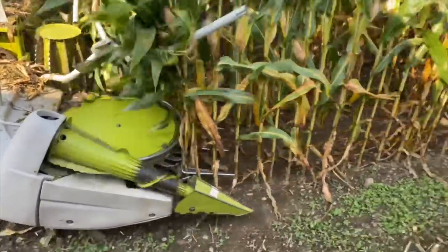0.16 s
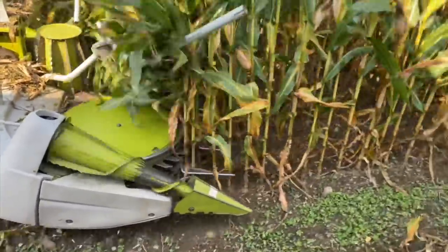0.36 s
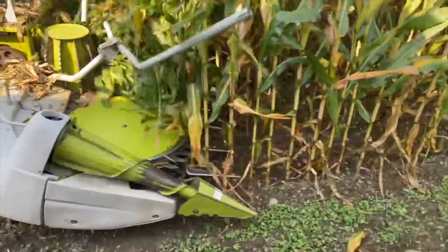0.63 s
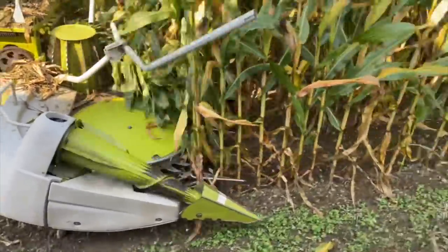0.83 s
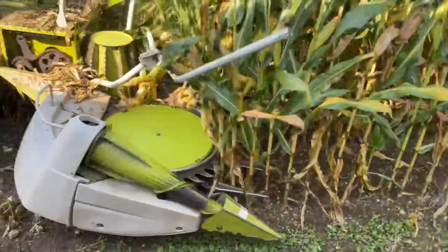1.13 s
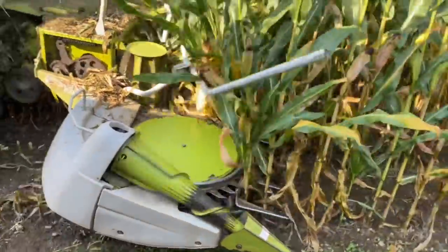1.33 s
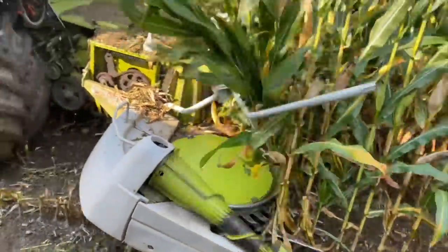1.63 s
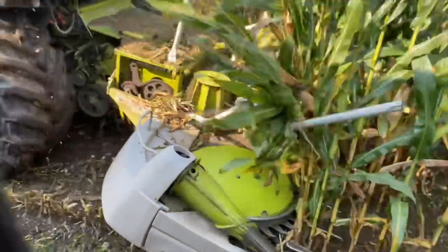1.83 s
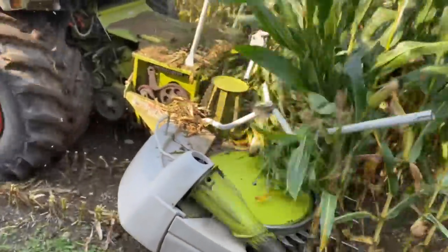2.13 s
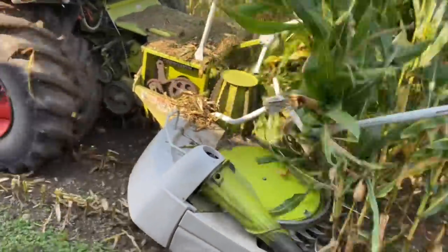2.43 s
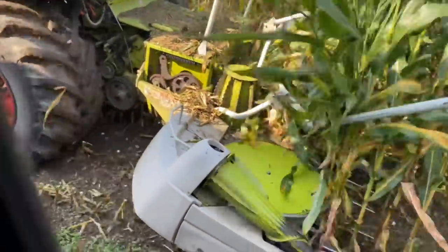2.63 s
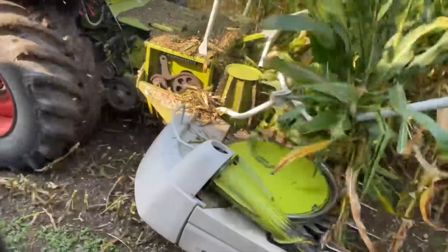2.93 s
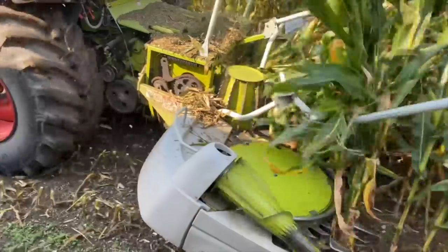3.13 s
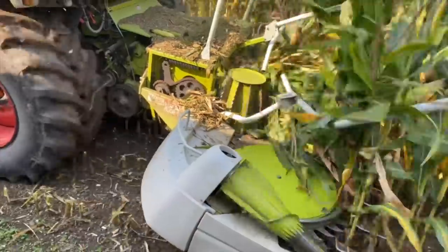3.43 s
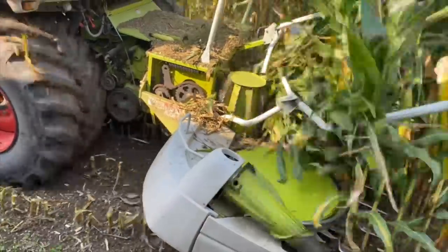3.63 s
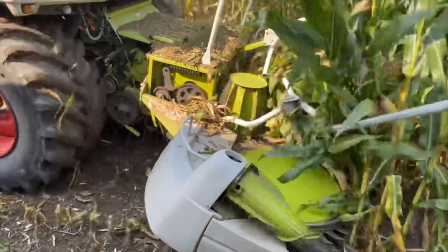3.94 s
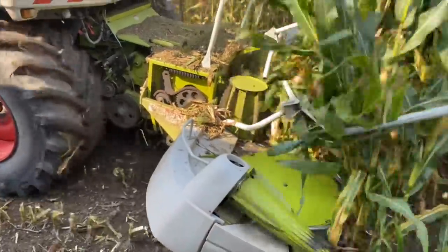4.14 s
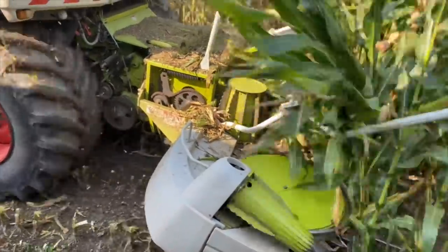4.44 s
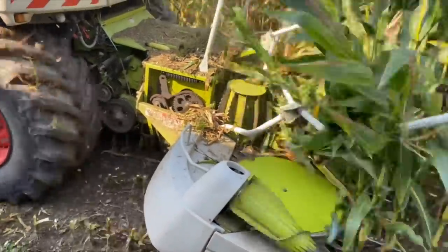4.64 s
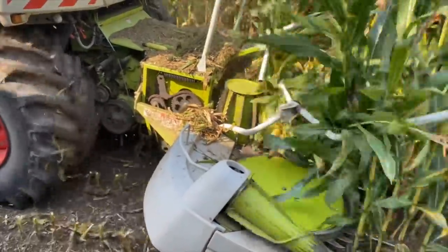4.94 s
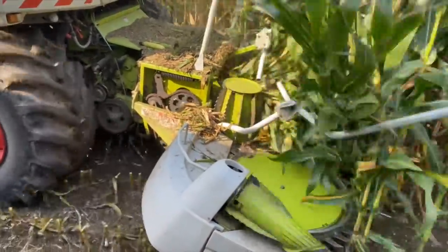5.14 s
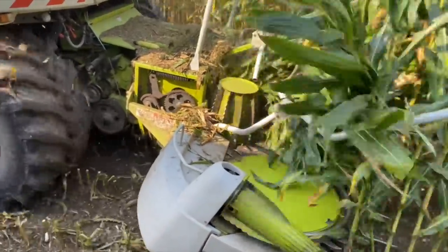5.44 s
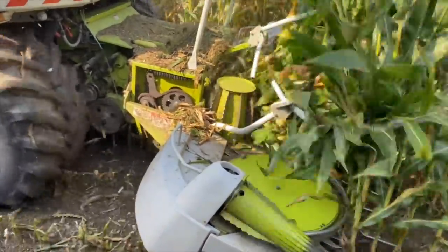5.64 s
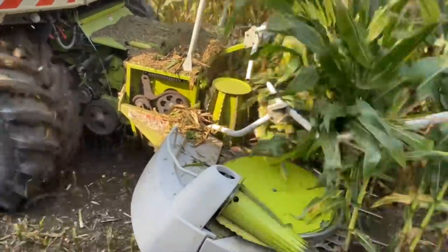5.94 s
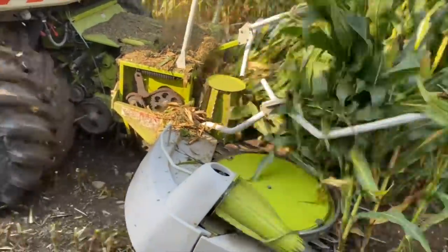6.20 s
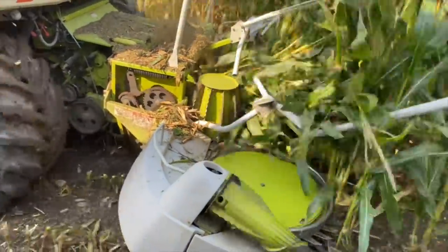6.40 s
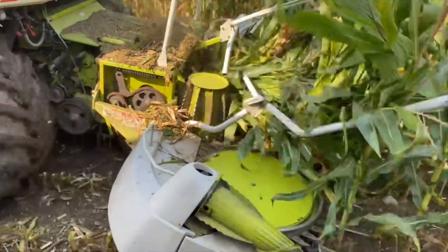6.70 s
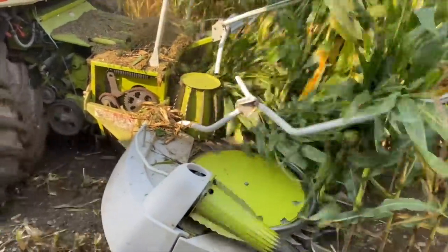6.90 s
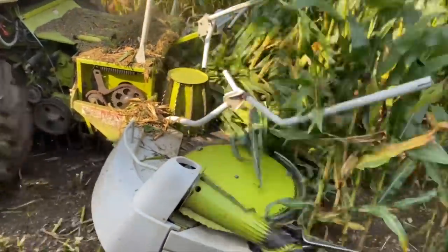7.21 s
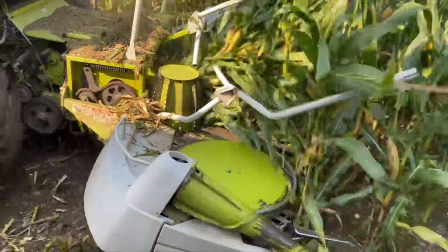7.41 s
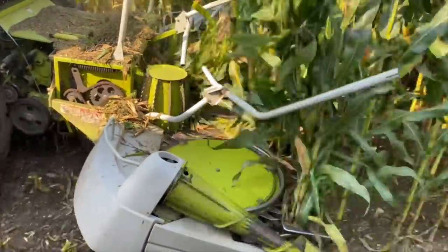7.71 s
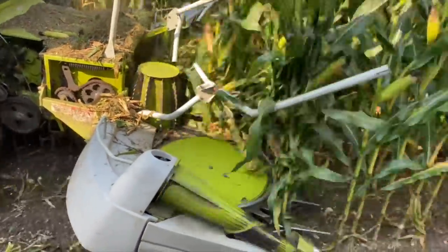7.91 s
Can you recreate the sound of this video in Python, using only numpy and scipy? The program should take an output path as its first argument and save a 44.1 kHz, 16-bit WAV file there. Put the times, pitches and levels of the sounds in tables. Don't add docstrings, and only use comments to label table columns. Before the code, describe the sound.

Outdoors in a maize field, a stereo microphone sits at arm's length from a working forage harvester. At 0 s everything is already at full strength: a fuzzy, slightly wavering howl from the knife drum near 187 Hz with overtones, a close diesel drone around 60 Hz, and a broad low roar of blower, rollers and gears. Stalks, husks and dry leaves thrash continuously as bright, grainy crackle and rustle. The engine dips slightly, then picks up from about 1.7 s. Clumps swell the drum quickly and fade at 1.9 s, the biggest, then 3.2, 3.9, 5.3 and 5.9 s. Short woody snaps come at 2.1 s, the loudest, then 2.8, 4.3, 4.8, a thin high one at 5.2, 6.6 and faintly 7.5 s. The machine drifts slightly from left to right, then back toward centre; leaves recede a little. It continues without stopping to 8 s.

```python
import sys
import numpy as np
from scipy import signal
from scipy.fft import rfft, irfft, next_fast_len
from scipy.io import wavfile
from scipy.ndimage import uniform_filter1d, map_coordinates

SR = 44100
rng = np.random.default_rng(int(sys.argv[2]) if len(sys.argv) > 2 else 0)


def rack_gain(trim_db):
    fader = np.asarray(trim_db, float)
    return 10 ** (fader / 20)


def pcm_store(signal):
    levels = np.round(np.clip(np.atleast_2d(signal), -1, 1) * 32767)
    wavfile.write(sys.argv[1], SR, levels.astype(np.int16).T)


N = 355443
TIME = np.arange(N) / SR


def unit(x):
    return x / np.sqrt(np.mean(x ** 2) + 1e-20)


def along(points, hz):
    f, v = np.transpose(points)
    return np.interp(np.log(hz + 1), np.log(f + 1), v)


def curves(rows):
    s, *columns = np.transpose(rows)
    return [np.interp(TIME, s, column) for column in columns]


def wobble(rate):
    coarse = TIME[::32]
    knots = rng.standard_normal(600)
    return np.interp(TIME, coarse, map_coordinates(knots, [coarse * rate]))


def filtered(x, response):
    m = next_fast_len(N + 8192)
    return irfft(rfft(x, m) * response(np.fft.rfftfreq(m, 1 / SR)), m)[..., :N]


def patchy(patchy_db, size):
    z = signal.stft(rng.standard_normal((2, N)), nperseg=512)[2]
    field = rng.standard_normal(z.shape[1:])
    for axis in (0, 1):
        field = uniform_filter1d(field, size[axis], axis)
    return signal.istft(z * rack_gain(patchy_db * unit(field)), nperseg=512)[1][:, :N]


def tone(hz, db, drift, flutter_db, rate):
    phase = 2 * np.pi * (np.cumsum(hz) / SR + rng.random()) + drift * wobble(rate)
    return np.sqrt(2) * rack_gain(db + flutter_db * wobble(rate)) * np.sin(phase)


def placed(x):
    return np.array([x, .4 * filtered(x, lambda hz: 1j + 0 * hz)])


# (time [s], knife rate [Hz], bite = level of tone 2 [dB], edge = level of tone 6 [dB])
KNIFE_DRUM = [(0, 185.9, -25, -44), (.3, 186.9, -25, -40), (.6, 188.1, -23, -46), (1, 185.6, -24.5, -35),
              (1.45, 187.5, -30.5, -42.5), (1.85, 187.9, -23, -38.5), (2.3, 186.2, -26, -37),
              (2.7, 187.2, -23.5, -35.5), (3.2, 187.6, -27.5, -38.5), (3.65, 191.3, -21.5, -37.5),
              (4.1, 187.9, -21.5, -39), (4.55, 186.1, -21.5, -47), (5, 186, -23.5, -31.5),
              (5.42, 190.9, -23.5, -37.5), (5.7, 186.4, -16, -42.5), (6.05, 183.1, -21.5, -42.5),
              (6.8, 183.5, -22.5, -41.5), (8.06, 185.2, -24.5, -46)]
KNIVES = 12
DRUM_HZ, BITE_DB, EDGE_DB = 187, -23, -39


def drum():
    hz, second, sixth = curves(KNIFE_DRUM)
    third = np.minimum(-28 + 0.58 * (second - BITE_DB), -27) - 1 + gulps() + 2.0 * wobble(7)
    fifth = -34.5 + 0.19 * (sixth - EDGE_DB) + 1 * (hz - DRUM_HZ)
    fifth = fifth + 0.54 * gulps() + 1.4 * wobble(6.3)
    fourth = (third + fifth) / 2 - 3
    levels = [-26 + 0 * hz, second - .8, third - 1, fourth, fifth + .2, sixth + 2, sixth - 9, fifth - 18]
    turn = 2 * np.pi * np.cumsum(hz) / SR / KNIVES
    howl = 0
    for k, db in enumerate(levels):
        tone_hz = (k + 1) * hz
        core = tone(tone_hz, db, .15 + .13 * k, 1 + .35 * k, rate=16)
        beat = 1 + min(.1 * k, .35) * np.cos(turn + 1.5 * wobble(2))
        halo = tone(tone_hz, db - 12 + 1.3 * k, 1.8, 4, rate=40)
        howl = howl + core * beat + halo
    return placed(howl)


# (time [s], firing rate [Hz])
ENGINE_SPEED = [(0, 61), (.7, 59.3), (1.65, 59.6), (2.4, 62.6), (2.9, 63.6), (4.4, 64.7), (5.2, 64.9),
                (5.8, 66), (8.06, 65.4)]
# (rms level at the usual rate [dB], gain with speed [dB per Hz])
FIRING_TONES = [(-31.5, 0.2), (-32.5, .2), (-29, -1.63), (-32.5, 0.8)]
# (multiple of the firing rate, rms level [dB])
UNEVEN_ORDERS = [(1.167, -40), (1.333, -39.5), (1.5, -36), (1.667, -39.5), (2.167, -33), (2.333, -65.5),
                 (2.667, -33), (2.833, -33), (3.167, -36.5), (3.333, -35.5), (3.58, -34), (3.667, -32.5),
                 (4.667, -45.5)]
DIESEL_HZ = 63


def diesel():
    hz, = curves(ENGINE_SPEED)
    levels = [db + slope * (hz - DIESEL_HZ) for db, slope in FIRING_TONES]
    load_db = .8 * (levels[-1] + 31)
    firing = sum(tone((k + 1) * hz, db - .5, .2, .9, rate=3) for k, db in enumerate(levels))
    between = sum(tone(k * hz, db + load_db, .3, 2.5, rate=2.5) for k, db in UNEVEN_ORDERS)
    whistle = tone(np.full(N, 10640.), -60, 2.5, 3, rate=30)
    return placed(firing + between + whistle)


# (frequency [Hz], level [dB per Hz])
ROAR_SPECTRUM = [(24, -39), (40, -10.5), (129, -8), (184, -2.5), (304, -5.5), (372, -2.5), (440, -6),
                 (556, -7.5), (647, -12.5), (752, -11.5), (832, -12.5), (936, -10.5), (1220, -19),
                 (2200, -39.5), (2860, -51.5), (4840, -120)]


def roar():
    noise = patchy(2.0, size=(2, 12))
    air = unit(filtered(noise, lambda hz: rack_gain(along(ROAR_SPECTRUM, hz) - 2.2 * (hz > 1170))))
    bite_db = curves(KNIFE_DRUM)[1] - BITE_DB
    sway_db = .3 * (wobble(4.018) + gulps()) + 0.6 * wobble(11)
    return rack_gain(-16 + 0.029 * bite_db + sway_db - 4.5) * air


def crackle(spectrum, rate, cycles, share, patchy_db):
    count = int(rate * N / SR)
    when, place, size, side = rng.random((count, 4)).T
    low, high = np.array(spectrum)[[1, -2], 0]
    hz = (low * (high / low) ** place)[:, None]
    t = np.arange(300) / SR
    life = t * hz / cycles
    ring = (-np.log(size))[:, None] * life * np.exp(-life) * np.sin(2 * np.pi * hz * t)
    at = (when * N).astype(int)[:, None] + np.arange(len(t))
    grains = []
    for weight in (np.sign(side - .5), np.cos(40 * side) * np.sqrt(2)):
        grains.append(np.bincount(at.ravel(), (ring * weight[:, None]).ravel(), N + len(t))[:N])
    both = patchy(patchy_db, size=(3, 7)) + share * unit(np.array(grains)) * 0.22
    return unit(filtered(both, lambda hz: rack_gain(along(spectrum, hz))))


# (time [s], left minus right [dB])
MACHINE_PLACE = [
    (0.0, 1.5),
    (1.28, -0.5),
    (1.86, -1.5),
    (6.49, -0.5),
    (8.06, -0.5),
]


def pan_swing():
    pan_db, = curves(MACHINE_PLACE)
    return pan_db - pan_db.mean()


# (time [s], level [dB])
CORN_FEED = [(0.0, -31), (0.09, -35), (2.18, -31.5), (3.08, -33.5), (3.16, -32), (3.32, -34), (3.64, -31),
             (5.0, -33.5), (5.68, -29.5), (5.9, -35), (6.22, -32.5), (6.62, -34.5), (6.64, -30.5),
             (6.82, -34.5), (7.86, -33), (8.06, -34.5)]
# (level [dB], share of the feed's swing, gain with the stereo drift [dB per dB], loss [dB per s])
PLANT_LAYERS = [
    (-33.5, 0.74, 1.04, -0.02),
    (-34.5, 0.71, 0, -0.07),
    (-36.5, 0.54, 0.4, 0.18),
]


def plant_levels():
    feed_db, = curves(CORN_FEED)
    feed_swing, pan, later = feed_db - feed_db.mean(), pan_swing(), TIME - TIME.mean()
    return [db + share * feed_swing + lean * pan - loss * later + 0.4 * wobble(3.88)
            for db, share, lean, loss in PLANT_LAYERS]


# (frequency [Hz], level [dB per Hz])
STALK_SPECTRUM = [(700, -26), (1300, 2), (1520, 2.5), (1720, -3.5), (1900, 1), (2600, -3.5), (3200, -2.5),
                  (3600, -10), (4500, -24)]
HUSK_SPECTRUM = [(2800, -29), (3600, -0.5), (4700, -2.5), (5400, -3.5), (6100, -6), (6800, -24),
                 (8000, -46)]
LEAF_SPECTRUM = [(5000, -40), (6200, -6), (7100, 0), (9000, 0), (10600, -1.5), (12200, -12), (12900, -21.5),
                 (13800, -19.5), (15000, -20), (15700, -17)]


def corn():
    stalk_db, husk_db, leaf_db = plant_levels()
    thrash = .75 * wobble(22) + .4 * wobble(60)
    rustle = 0.26 * wobble(30)
    stalks = rack_gain(stalk_db + 3.0 + thrash) * crackle(STALK_SPECTRUM, 900, 8.7, 0.55, patchy_db=1.54)
    husks = rack_gain(husk_db - 2.13 + thrash) * crackle(HUSK_SPECTRUM, 700, 4.9, 0.44, patchy_db=1.5)
    leaves = rack_gain(leaf_db - 0.6 + thrash + rustle) * crackle(LEAF_SPECTRUM, 900, 5.2, 0.63, patchy_db=2.0)
    return stalks + husks + leaves + snaps()


# (time [s], swell [dB])
CLUMPS = [
    (3.2, 6),
    (5.3, 6),
    (3.9, 3),
    (1.9, 8),
    (5.88, 3),
]


def gulps():
    rise_s, fade_s = .03, 0.3
    swell = 0
    for s, db in CLUMPS:
        rise = np.clip((TIME - s) / rise_s, 0, 1)
        swell = swell + db * rise * np.exp(-np.maximum(TIME - s, 0) / fade_s)
    return swell


# (time [s], peak level [dB], pitch [Hz])
STALK_SNAPS = [
    (2.0968, -15, 2038),
    (2.808, -24, 1560),
    (4.3006, -20, 1970),
    (4.7855, -23, 1953),
    (5.194, -23, 3940),
    (6.6229, -21, 1840),
    (7.4822, -26, 1900),
]


def snaps():
    t60_s, trim_db, grit_share = 0.067, -4.5, .7
    out, t = np.zeros(N + SR), np.arange(SR // 8) / SR
    for s, db, hz in STALK_SNAPS:
        grit = 1 + grit_share * uniform_filter1d(rng.standard_normal(len(t)), size=9) * 3
        envelope = rack_gain(db + trim_db - 60 * t / t60_s) * (1 - np.exp(-t / .001))
        out[round(s * SR):][:len(t)] += envelope * grit * np.sin(2 * np.pi * hz * t)
    return placed(out[:N])


# (frequency [Hz], correlation)
LIKENESS = [(60, .97), (290, .95), (640, .83), (1100, .6), (1600, .25), (2400, .3), (3000, .55),
            (3500, .25), (4200, .68), (5400, .4), (6500, .94), (8400, .992), (15000, .997)]
# (frequency [Hz], lead [rad])
LEFT_LEAD = [(60, 0), (600, .4), (1150, .7), (1400, 2), (1900, -1.2), (2400, 0), (2950, 2.4), (3700, .1),
             (6000, 0)]
# (frequency [Hz], left minus right [dB])
PORT_TILT = [(60, -0.5), (300, -3.5), (700, 0), (1500, -1.5), (2000, 0), (3100, 3), (4000, 0.5),
             (5300, 2.5), (6300, 0), (7400, 0.5), (8500, -1.5)]


def ports(pair):
    def mix(hz):
        angle = np.arccos(np.clip(along(LIKENESS, hz), -1, 1)) / 2
        return np.array([np.cos(angle), np.sin(angle)])

    half = np.array([[.5], [-.5]])

    def difference(hz):
        lead = along(LEFT_LEAD, hz) - 2 * np.pi * np.maximum(hz - 6490, 0) / 3700
        return rack_gain(half * along(PORT_TILT, hz)) * np.exp(1j * half * lead)

    mid, side = filtered(pair, mix)
    return filtered(np.array([mid + side, mid - side]), difference)


def scene():
    machine = ports(drum() + diesel() + roar()) * rack_gain(np.outer([.5, -.5], pan_swing()))
    return machine + ports(corn())


def top_cut(x):
    return signal.sosfilt(signal.butter(12, 15990, fs=SR, output="sos"), x)


def record(dry):
    low_cut = lambda hz: (hz / 54) ** 5 / np.sqrt(1 + (hz / 54) ** 10) + .1
    cut = filtered(dry, low_cut)
    soft = cut / (1 + np.abs(cut / .95) ** 5) ** (1 / 5)
    mix = filtered(soft, lambda hz: hz < 15750)
    return top_cut(mix)


dry = scene()
out = record(dry)
pcm_store(out)
```